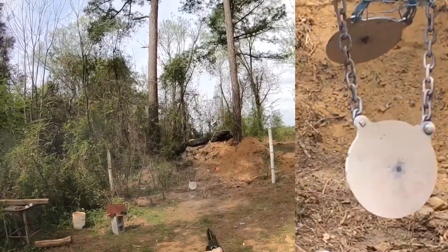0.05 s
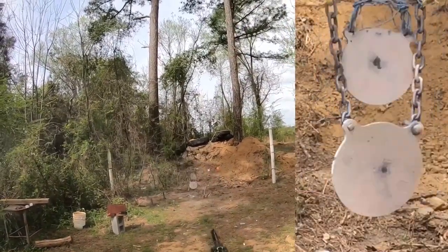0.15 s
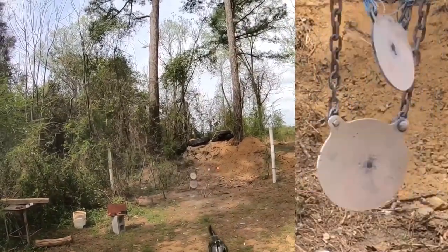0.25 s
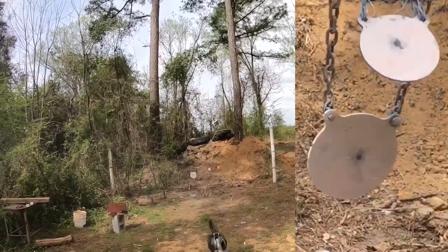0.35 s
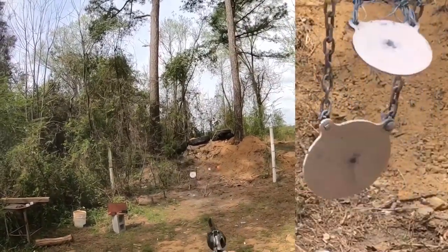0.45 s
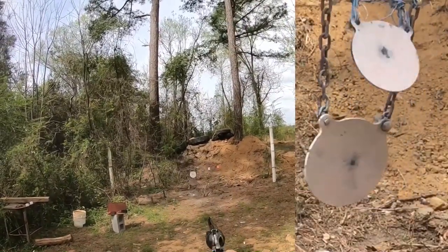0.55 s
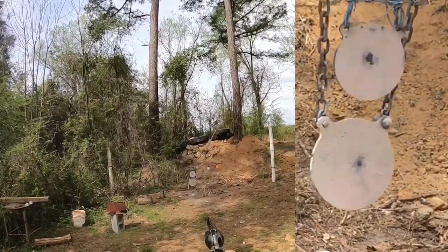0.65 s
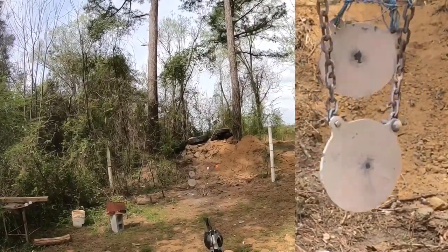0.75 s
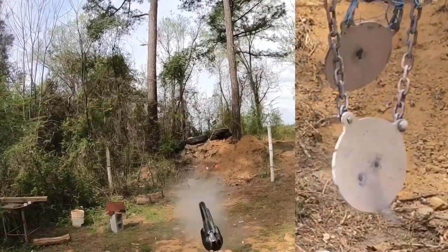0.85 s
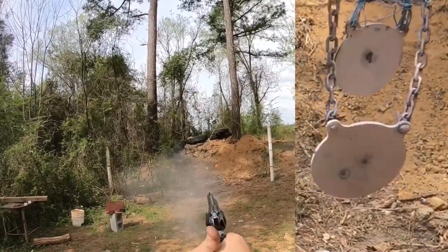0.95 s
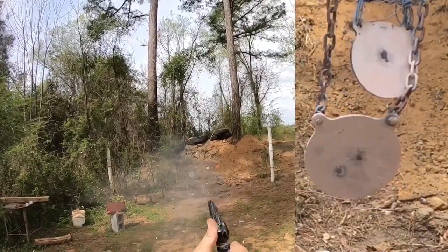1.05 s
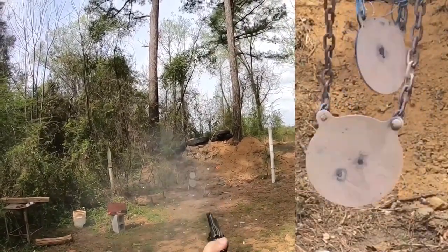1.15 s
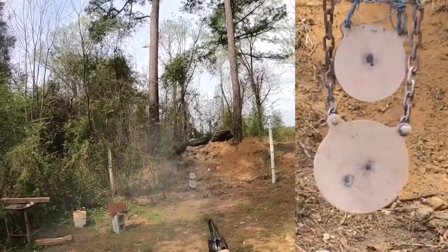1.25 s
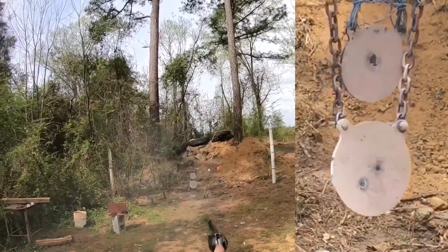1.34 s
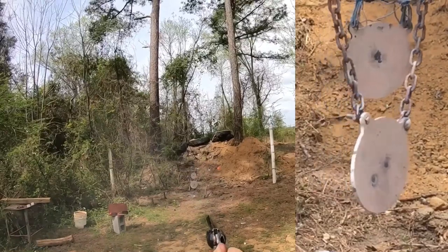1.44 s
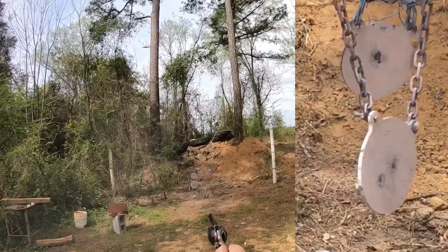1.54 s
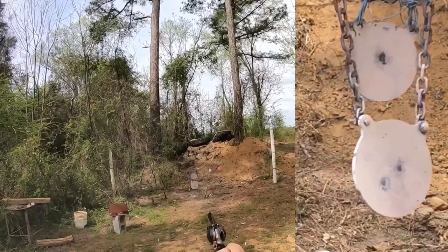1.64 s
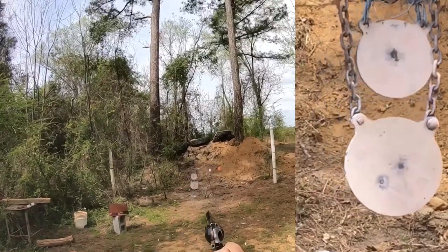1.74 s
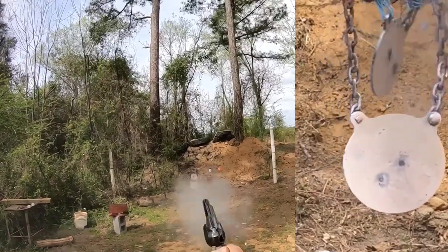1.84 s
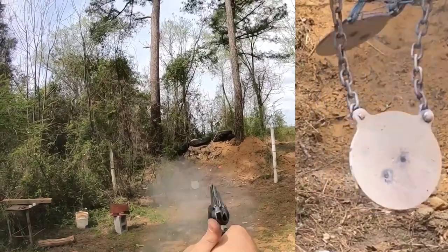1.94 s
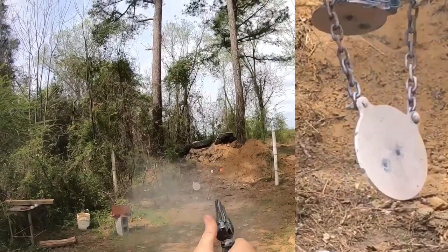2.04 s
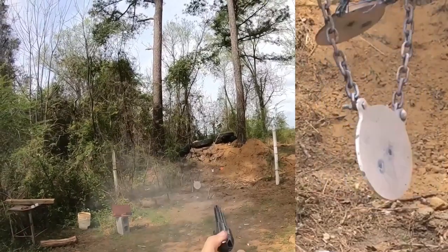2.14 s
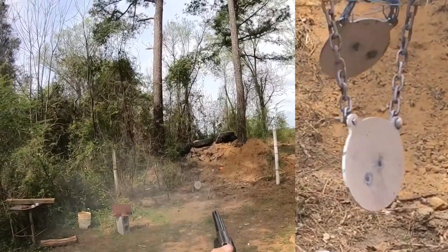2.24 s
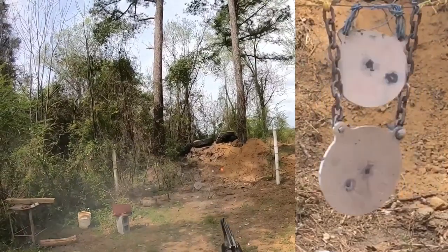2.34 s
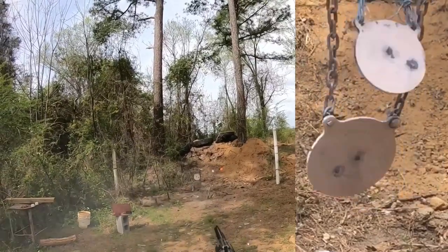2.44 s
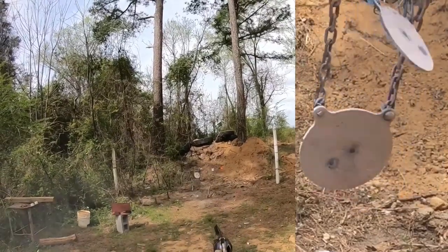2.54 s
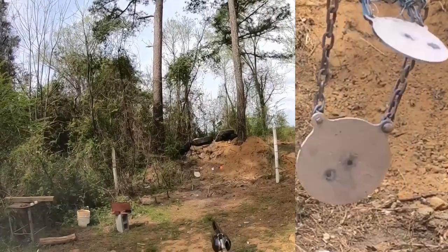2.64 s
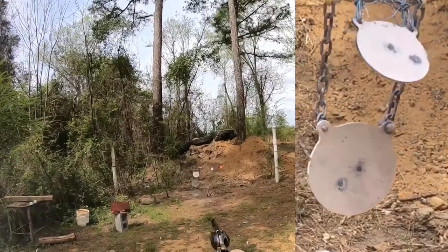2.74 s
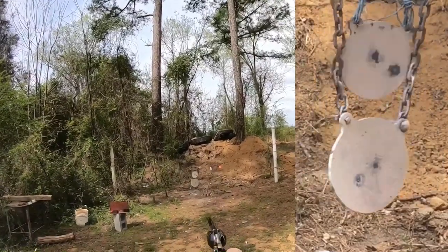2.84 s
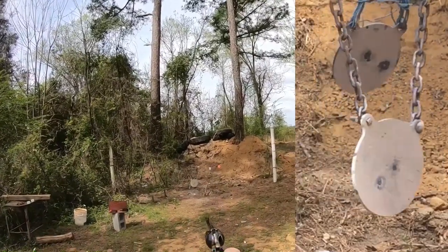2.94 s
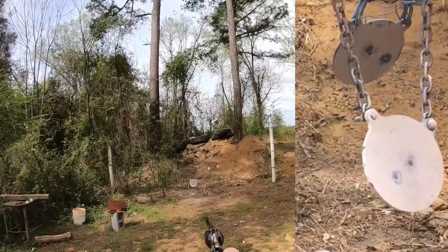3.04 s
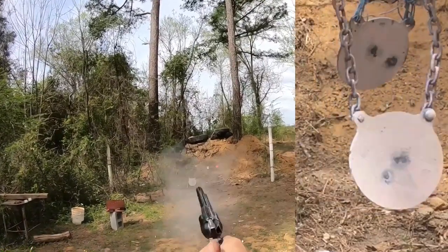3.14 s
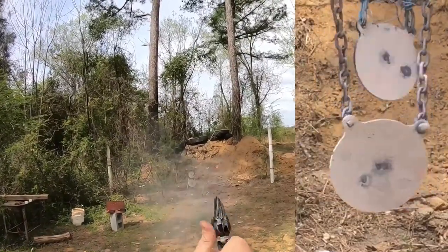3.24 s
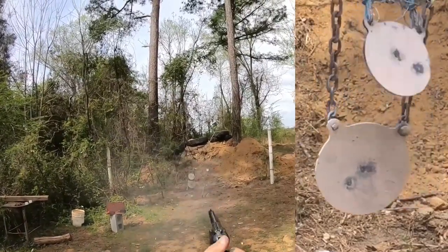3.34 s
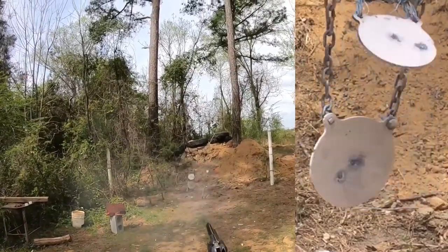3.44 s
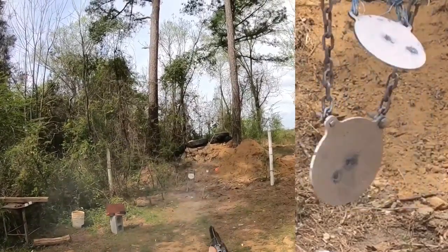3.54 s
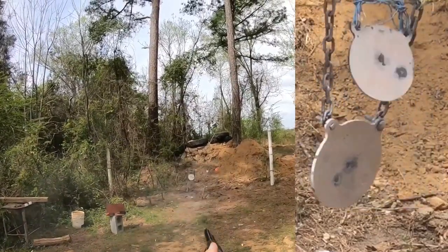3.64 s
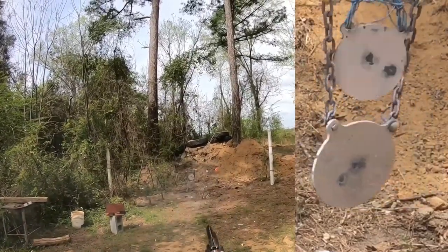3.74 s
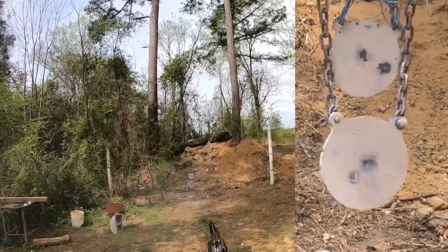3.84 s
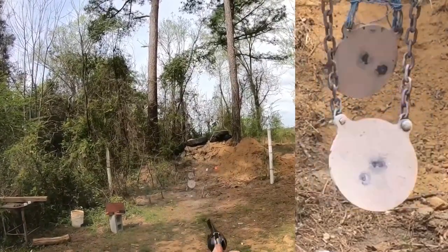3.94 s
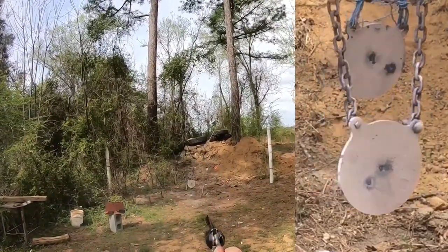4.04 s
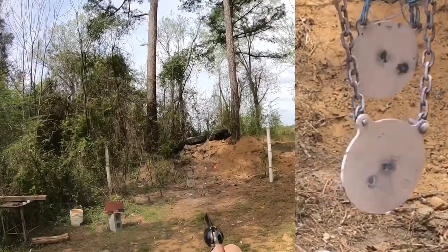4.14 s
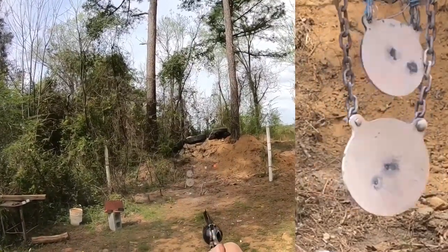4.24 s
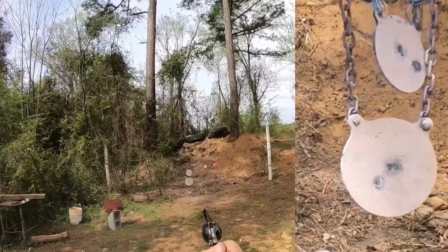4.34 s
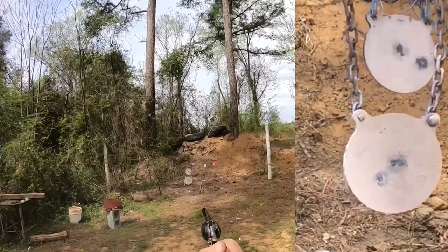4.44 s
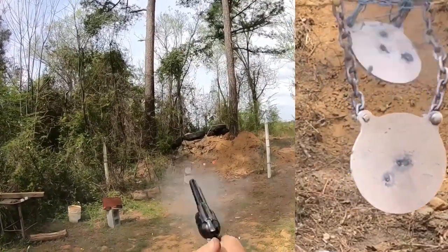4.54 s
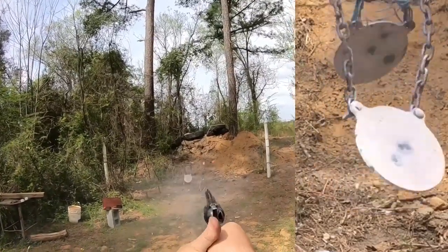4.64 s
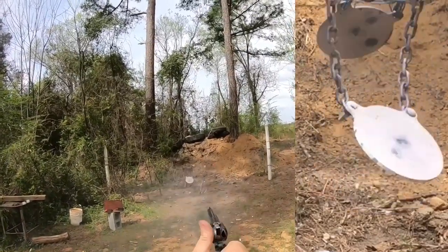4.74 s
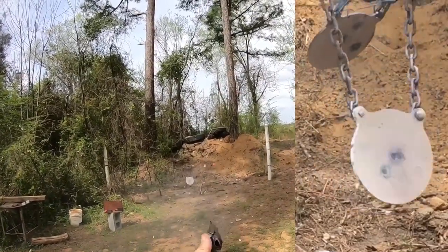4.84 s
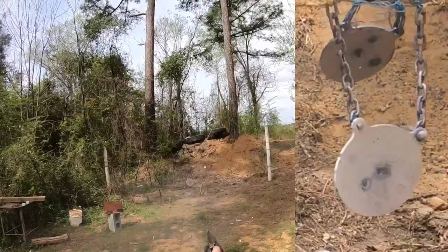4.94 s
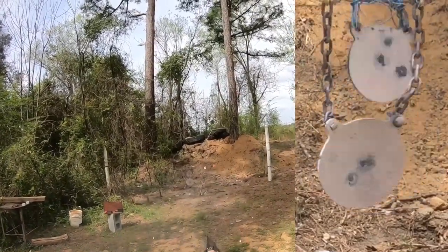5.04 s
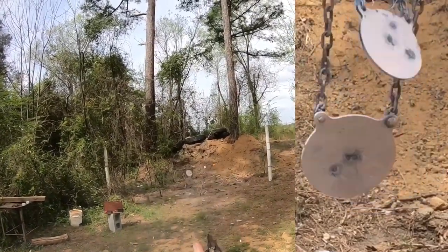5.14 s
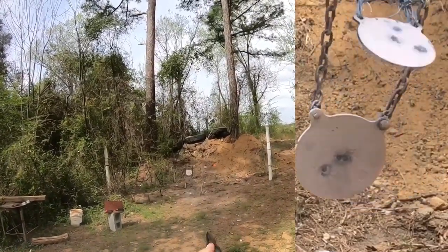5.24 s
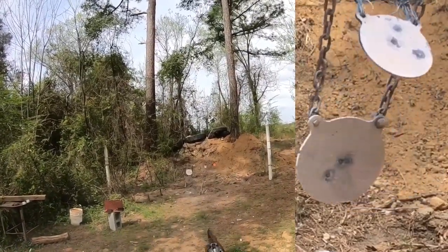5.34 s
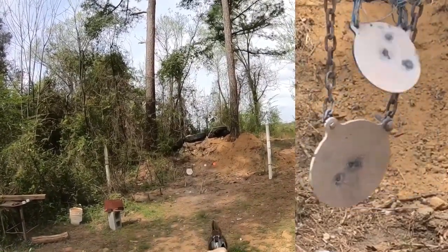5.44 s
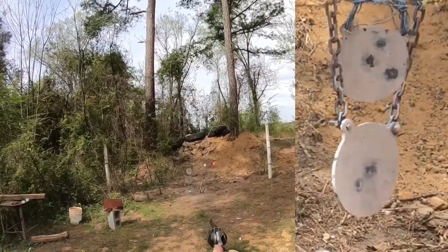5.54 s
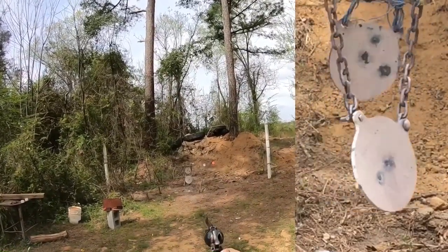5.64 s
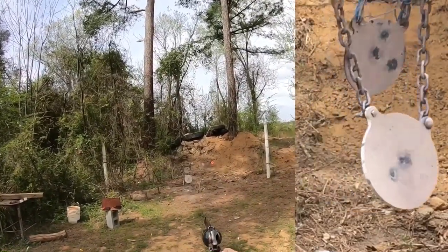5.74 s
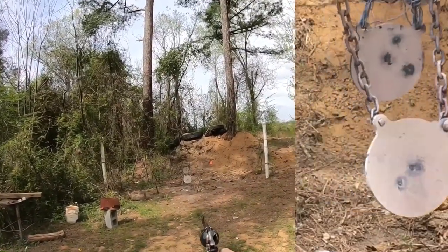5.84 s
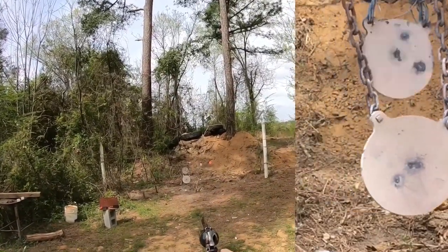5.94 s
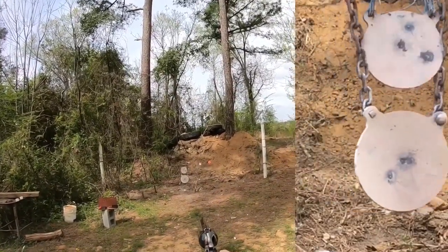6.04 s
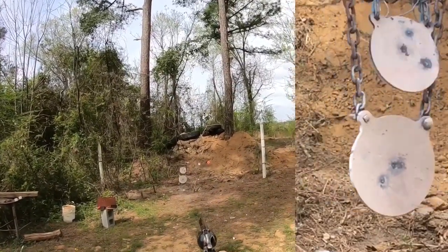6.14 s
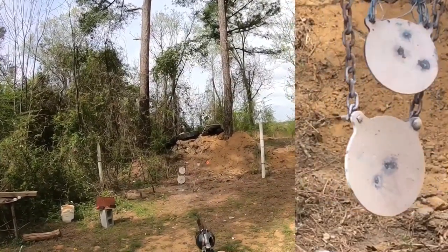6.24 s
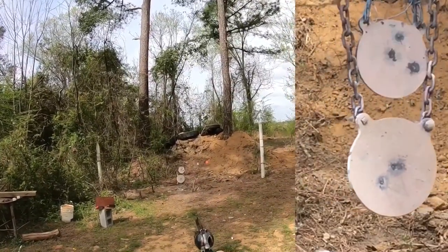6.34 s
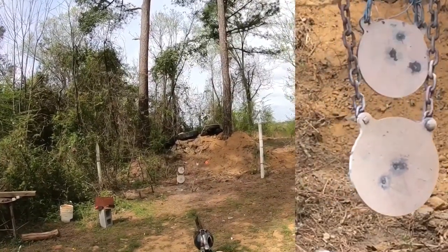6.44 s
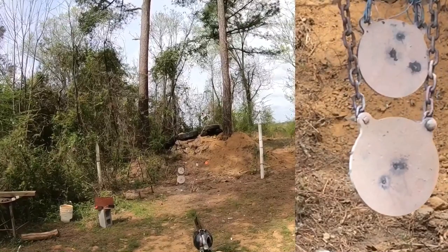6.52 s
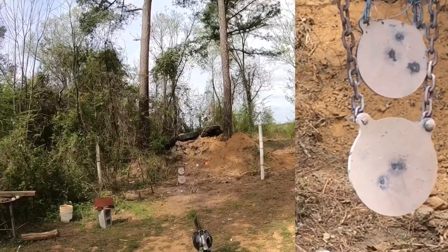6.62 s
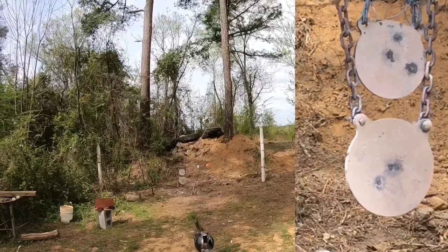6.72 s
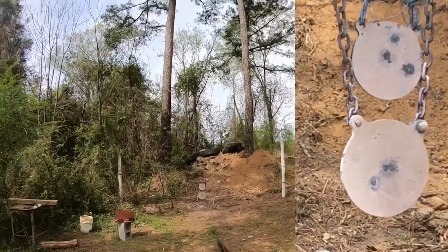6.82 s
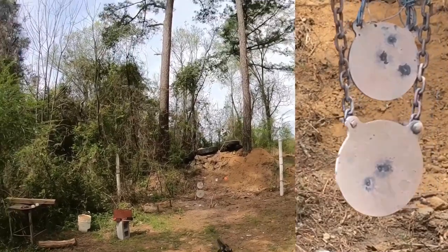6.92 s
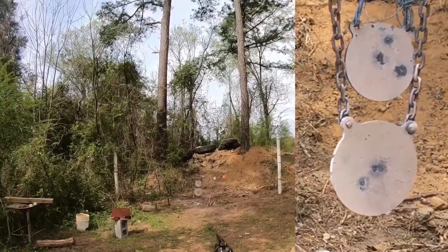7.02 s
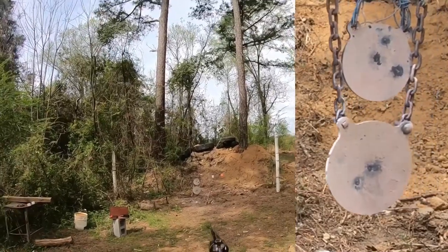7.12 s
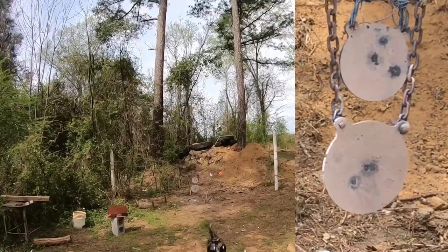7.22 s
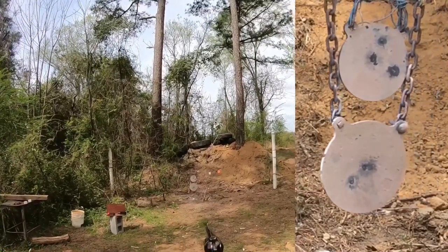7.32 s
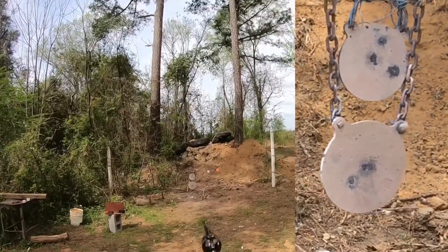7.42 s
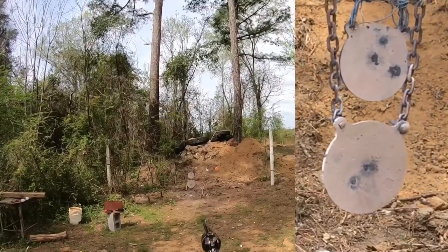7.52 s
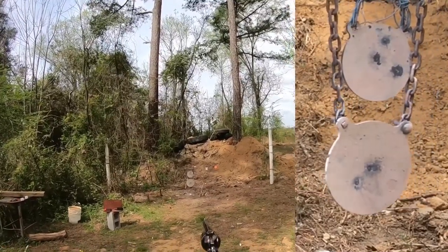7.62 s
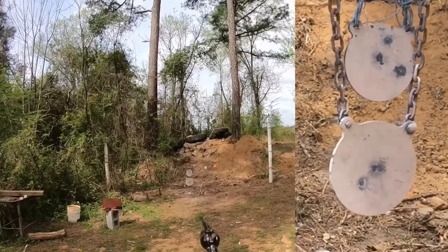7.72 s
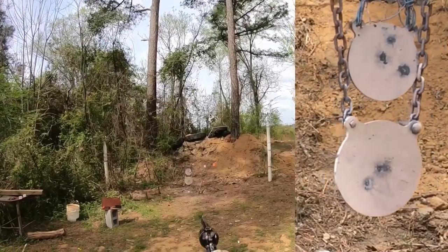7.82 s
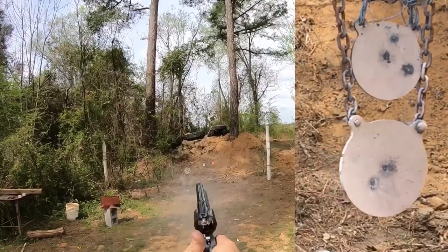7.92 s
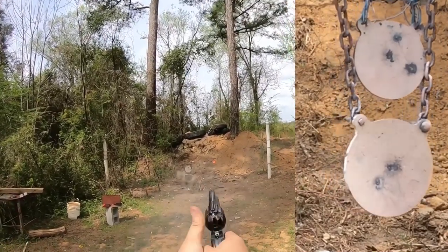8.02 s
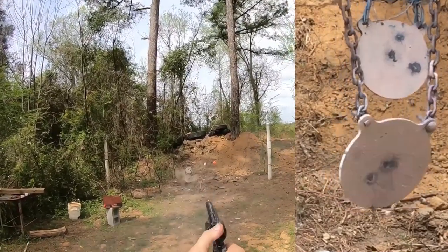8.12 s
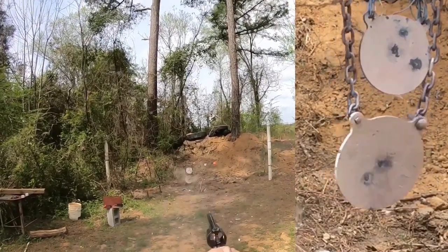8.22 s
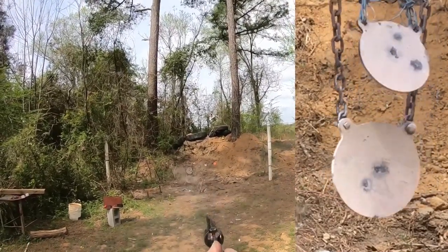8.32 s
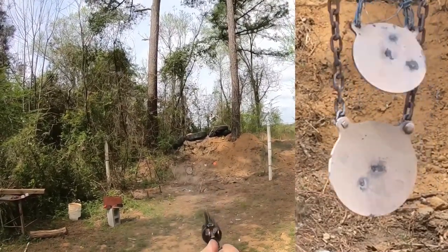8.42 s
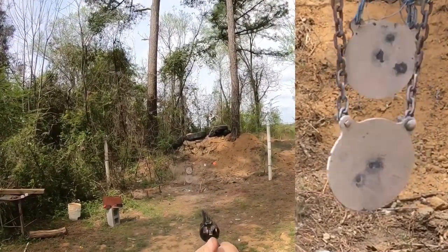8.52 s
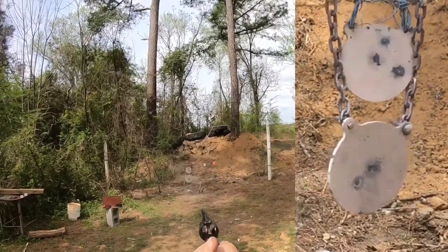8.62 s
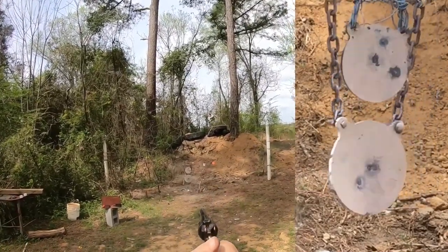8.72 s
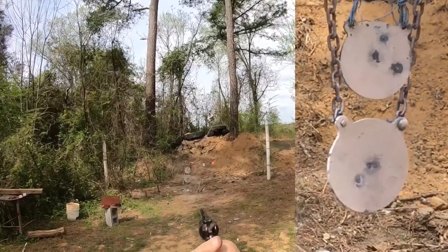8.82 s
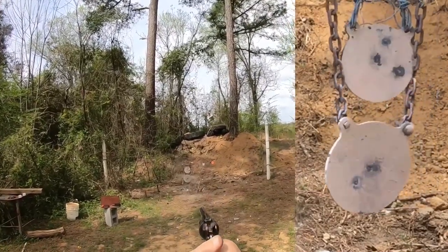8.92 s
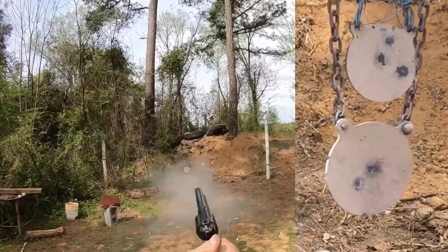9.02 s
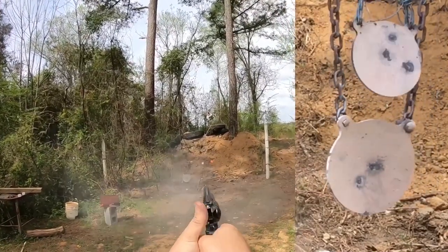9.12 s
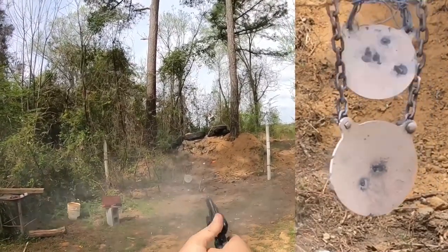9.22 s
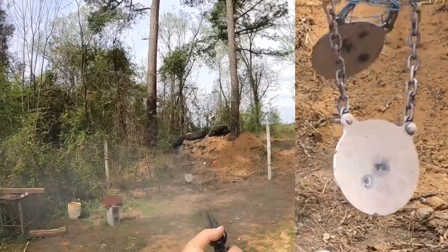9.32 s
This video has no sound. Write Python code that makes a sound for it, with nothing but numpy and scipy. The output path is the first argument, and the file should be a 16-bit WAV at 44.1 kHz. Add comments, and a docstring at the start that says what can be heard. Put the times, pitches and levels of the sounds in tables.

```python
"""Shooting range in front of a wood: a revolver is fired at two round steel plates hung on chains.
Six reports, and the tail of one before the start: noise bursts and decaying sines crack, thump and boom.
Band-wise decaying noise rolls back from the trees. Struck plates ring as sums of decaying modes,
then swing and clank against their chains. The action clicks between shots as short noise bursts.
Behind: light air, wind and handling buffets, a low hum, far birds, one bright scuff."""
import sys
import numpy as np
from scipy import signal
from scipy.fft import rfft, irfft, next_fast_len
from scipy.io import wavfile

SR = 44100
rng = np.random.default_rng(int(sys.argv[2]) if len(sys.argv) > 2 else 0)


def pcm_store(signal):
    """Save signal as 16-bit PCM."""
    levels = np.round(np.clip(np.atleast_2d(signal), -1, 1) * 32767)
    wavfile.write(sys.argv[1], SR, levels.astype(np.int16).T)


N = 413216


def from_db(db):
    """Decibels to amplitude gain."""
    return np.exp(np.asarray(db) * (np.log(10) / 20))


def rms_one(x):
    """Scale to unit power."""
    return x / np.sqrt(np.mean(x ** 2) + 1e-20)


def seconds(length_s):
    """Time axis of a sound."""
    return np.arange(int(length_s * SR)) / SR


def add(out, start_s, sound):
    """Mix a sound in at start_s, trimmed to the scene."""
    at = int(round(start_s * SR))
    first, last = max(at, 0), min(at + sound.shape[-1], N)
    if last > first:
        out[:, first:last] += sound[..., first - at:last - at]


def at_hz(points, hz):
    """Read a table on a log-frequency axis."""
    points = np.array(points)
    return np.interp(np.log(hz), np.log(points[:, 0]), points[:, 1])


def wander(axis, step):
    """Random line of spread about 1, linear between new values at every step."""
    knots = np.arange(0, axis[-1] + 2 * step, step)
    return np.interp(axis, knots, rng.standard_normal(len(knots)))


def fall(t, t60, hold=0):
    """Full level for hold, then exponential decay by 60 dB per t60."""
    return from_db(-60 * np.maximum(t - hold, 0) / t60)


# stereo width, bass agrees and treble parts: f/Hz, side re mid/dB before the side_db offset
STEREO_WIDTH = [(60, -15.5), (200, -25), (380, -15.5), (700, -7), (1290, -3), (2400, -6), (4400, -8),
                (8100, 0), (15000, -10)]


def noise(spectrum, size, side_db, tilt_db=0, jagged_db=0):
    """Stereo noise of given colour and width, rms 1; jagged_db roughens the spectrum at random."""
    padded = next_fast_len(size)
    hz = np.maximum(np.arange(padded // 2 + 1) * SR / padded, 1)
    jags = np.minimum(wander(hz, step=100), 2)
    level_db = at_hz(spectrum, hz) + tilt_db * np.log2(hz) + jagged_db * jags
    low_cut = hz / np.hypot(hz, spectrum[0][0] / 2)
    gain = from_db(level_db) * low_cut
    mid, side = gain * np.exp(2j * np.pi * rng.random((2, len(hz))))
    side = side * from_db(at_hz(STEREO_WIDTH, hz) + side_db)
    return rms_one(irfft([mid + side, mid - side], padded)[:, :size])


def burst(spectrum, t60, hold, side_db, tilt_db=0, jagged_db=0):
    """Puff of noise that holds and dies."""
    t = seconds(hold + t60)
    return noise(spectrum, len(t), side_db, tilt_db, jagged_db) * fall(t, t60, hold)


# air colour: f/Hz, level/dB per Hz (relative)
AIR_COLOUR = [(25, -11), (150, -10), (400, -17.5), (900, -20.5), (1500, -22.5), (2200, -19.5),
              (3400, -20.5), (5000, -31.5), (7500, -32), (9000, -25.5), (10500, -32), (16000, -31.5)]


def air():
    """Steady light air: coloured noise."""
    return from_db(-69.5) * noise(AIR_COLOUR, N, side_db=-1.0)


# hum: t/s, rms level/dB
HUM_LEVEL = [(2.5, -87.5), (2.8, -67), (3.8, -76), (4.4, -61.5), (5.4, -72), (5.95, -56.5), (6.85, -57),
             (7.2, -92)]


def hum():
    """Low hum: one sine whose level follows the table."""
    t = np.arange(N) / SR
    level = from_db(np.interp(t, *np.transpose(HUM_LEVEL)))
    return level * np.sqrt(2) * np.sin(2 * np.pi * 53.8 * t)


# wind and handling on the microphone: peak t/s, half-length/s, level/dB
MIC_BUFFETS = [(0.363, 0.19, -59), (1.417, 0.079, -59), (2.58, .03, -58), (6.397, 0.55, -70),
               (7.077, .05, -49), (7.502, 0.79, -66.5)]
# rumble colour: f/Hz, level/dB per Hz (relative)
RUMBLE_COLOUR = [(20, 1), (40, 1), (90, -2), (170, -12), (300, -31), (600, -54)]


def buffets(breeze_db=-74):
    """Low rumble noise: constant breeze plus bell-shaped buffets."""
    t = np.arange(N) / SR
    swells = [from_db(db) * np.exp(-((t - peak_s) / half_s) ** 2) for peak_s, half_s, db in MIC_BUFFETS]
    return (from_db(breeze_db) + sum(swells)) * noise(RUMBLE_COLOUR, N, side_db=12)


# far calls: t/s, length/s, start f/Hz, end f/Hz, level/dB (relative)
BIRD_CALLS = [(6.806, 0.1, 2720, 1990, -61), (7.497, 0.1, 1489, 1437, -72),
              (7.709, 0.25, 3360, 2550, -62.5)]


def birds():
    """Gliding tones multiplied by low noise: smeared by the trees."""
    out = np.zeros((2, N))
    blur_colour = [(20, 3), (150, -15), (600, -12), (3000, -80)]   # f/Hz, level/dB per Hz
    for start_s, length_s, start_hz, end_hz, db in BIRD_CALLS:
        glide_hz = np.linspace(start_hz, end_hz, int(length_s * SR))
        blur = noise(blur_colour, len(glide_hz), side_db=8)
        tone = np.sin(2 * np.pi * np.cumsum(glide_hz) / SR)
        add(out, start_s, from_db(db) * 2 * blur * np.hanning(len(glide_hz)) * tone)
    return out


# scuff colour: f/Hz, level/dB per Hz (relative)
SCUFF_SPECTRUM = [(1500, -9.5), (4000, -7), (7500, -6), (9200, 4), (10500, -6), (12500, 4), (16000, -11)]


def scuff():
    """Brief bright hiss of something brushing past: one noise burst."""
    out = np.zeros((2, N))
    hiss = burst(SCUFF_SPECTRUM, t60=0.22, hold=0.028, side_db=-19.0, jagged_db=3.0)
    add(out, 7.133, from_db(-54) * hiss)
    return out


ONSET_S, ONSET_DB = .04, -3
STEP_S, STEP_RISE_S, STEP_DB = 0.16, 0.088, 5.5
LATE_S, LATE_DB_PER_S = 0.54, 14
FADE_S, FADE_T60_S = 2.35, .6


def echo_build(age_s):
    """Echo gain by time after the shot: rises, steps up, decays more slowly, then fades quickly."""
    step = np.clip((age_s - STEP_S) / STEP_RISE_S, 0, 1)
    late_db = LATE_DB_PER_S * np.maximum(age_s - LATE_S, 0)   # offsets part of the band decay
    db = ONSET_DB + step * (STEP_DB - ONSET_DB) + late_db
    onset = np.clip(age_s / ONSET_S, 0, 1) ** 2
    return onset * from_db(db) * fall(age_s, FADE_T60_S, hold=FADE_S)


# echo bands: f/Hz, level/dB per Hz (relative), t60/s before each shot's length factor
WOOD_BANDS = [(45, -7, 1.0), (98, 1, 1.08), (206, -2, 0.95), (299.8, 0.5, 1.35), (626, -2.5, 2.145),
              (900, -5.5, 2.285), (1520, -10, 1.98), (3020, -10.5, 1.41), (4500, -15, 1.226),
              (8050, -17, 0.87), (11000, -27.5, 0.81), (15000, -38.5, .7)]


def wood():
    """Countless trunks scatter each report back: noise bands, each with its own decay, treble dying early."""
    t, out = np.arange(N) / SR, np.zeros((2, N))
    slow_t = t[::20]
    padded = next_fast_len(N)
    band_hz, band_db, band_t60 = np.transpose(WOOD_BANDS)
    answers = []
    for shot_s, _, _, echo_db, length in SHOT_TABLE:
        age = slow_t - shot_s
        answers.append((age, from_db(echo_db) * echo_build(age), length))
    scatter = rfft(noise(np.c_[band_hz, band_db], N, side_db=1.5), padded)
    log_hz = np.log(np.maximum(np.linspace(0, SR / 2, scatter.shape[1]), 1))
    shared_wander_db = wander(slow_t, step=.018)
    for share, t60 in zip(np.eye(len(band_hz)), band_t60):
        band = irfft(scatter * np.interp(log_hz, np.log(band_hz), share), padded)[:, :N]
        power = sum((answer * fall(age, t60 * length)) ** 2 for age, answer, length in answers)
        # the echo's level wavers at random, partly alike in all bands
        waver = from_db(shared_wander_db + wander(slow_t, step=.035))
        out += band * np.interp(t, slow_t, np.sqrt(power) * waver)
    return out + dull_roll()


def dull_roll():
    """The trees return one dull roll per shot: a hump of low noise."""
    out = np.zeros((2, N))
    colour = [(150, -42), (260, 2.0), (380, 0.5), (520, -4.0), (1100, -9.5),
              (2500, -17), (7000, -53), (16000, -80)]   # f/Hz, level/dB per Hz
    for shot_s, _, _, echo_db, _ in SHOT_TABLE:
        roll = noise(colour, int(.22 * SR), side_db=-14)
        add(out, shot_s + .2, from_db(echo_db - 10) * roll * np.hanning(roll.shape[1]))
    return out


# dry clicks, mostly hammer, pawl and cylinder: t/s, level/dB, treble tilt/dB per octave
ACTION_CLICKS = [(0.1655, -37, 2), (.1921, -40, 2), (.375, -48, 11), (.889, -37.5, 6), (1.264, -39, 4),
                 (2.376, -40, 1), (2.398, -37.5, 0), (3.7873, -40, -0.5), (3.845, -32.5, 1.5),
                 (5.367, -39.5, 3.5), (5.429, -31, 1), (5.8099, -49.5, 12), (6.75, -36.5, 4.5),
                 (6.7581, -15.5, 0), (6.766, -26.5, 2), (6.9025, -44.5, 0), (6.924, -35.5, 5),
                 (6.9314, -26, 3.5), (6.948, -24.5, -0.5), (7.1394, -47.5, 15), (7.1551, -45.5, -4.5),
                 (8.2433, -31, -3.5), (9.1278, -31.5, -2.5)]
# click colour: f/Hz, level/dB per Hz (relative)
ACTION_COLOUR = [(150, -52), (250, -26), (1310, -16), (1670, -8.5), (2440, -9), (2860, -4), (3840, -9.5),
                 (8400, -20.5), (10400, -27), (11900, -33.5), (16000, -45)]


def action(tail_db=-31.5, tail_t60_s=0.25):
    """Lockwork clicks: short noise bursts, each with a faint wide outdoor tail."""
    out = np.zeros((2, N))
    for start_s, db, tilt_db in ACTION_CLICKS:
        click = burst(ACTION_COLOUR, t60=0.022, hold=0.0011, side_db=-2.5, tilt_db=tilt_db)
        tail = burst(ACTION_COLOUR, tail_t60_s, hold=.03, side_db=2.0, tilt_db=tilt_db, jagged_db=-2.0)
        add(out, start_s, from_db(db) * click)
        add(out, start_s, from_db(db + tail_db) * tail)
    return out


def plate_ring(modes, levels_db, hold, length, attack, pan_db, flutter_db, wobble_hz,
               after_db=-60, after_length=1, bloom=.0002, ear_lag_cycles=0.022):
    """Decaying modes with a quiet after-ring; the jerking plate makes each waver in level and pitch."""
    stretch = max(length, after_length)
    time = seconds(min(hold + stretch * max(m[1] for m in modes), 1.5))
    out = np.zeros((2, len(time)))
    for (hz, t60, *_), db in zip(modes, levels_db):
        t = time[:max(int((hold + t60 * stretch) * SR), 2)]
        wobble = wobble_hz * np.cumsum(wander(t, step=.008)) / SR
        cycles = hz * t + rng.random() + wobble
        lag = ear_lag_cycles * rng.normal() * np.array([[0], [1]])
        slow = t[::20]
        after_ring = from_db(after_db) * fall(slow, t60 * after_length)
        level = np.maximum(fall(slow, t60 * length, hold), after_ring)
        level = level * (1 - np.exp(-slow / (bloom * (0.082 + rng.random()))))   # modes swell unequally
        level = np.interp(t, slow, level * from_db(flutter_db * wander(slow, step=.014)))
        pan = from_db(db + pan_db * rng.normal() * np.array([[1], [-1]]))
        out[:, :len(t)] += pan * (np.sin(np.float32(2 * np.pi * (cycles + lag))) * level)
    return out * (1 - np.exp(-time / attack))


# clear notes of the plates: name, f/Hz
CLEAR_NOTE_HZ = {"low": 3104, "mid": 5002, "high": 5181}
TURN_DIPS_PER_S, TURN_DIP_DB = 3.7, 2


def plate_note(note, swell, hold, t60, split_hz=11, partner_db=-15, right_lead=.4):
    """Clear note swells, holds, dies; dips as the plate turns edge-on; a split partner mode beats with it."""
    t = seconds(hold + t60)
    phase = 2 * np.pi * (CLEAR_NOTE_HZ[note] * t + rng.random())
    main = np.sin(phase + np.array([[0], [right_lead]]))   # lead/rad
    partner = from_db(partner_db) * np.sin(phase - 2 * np.pi * split_hz * t)
    turning = from_db(-TURN_DIP_DB * np.sin(np.pi * TURN_DIPS_PER_S * t) ** 2)
    envelope = (1 - np.exp(-t / swell)) * fall(t, t60, hold)
    return np.sqrt(2) * (main + partner) * turning * envelope


TAUT_RING, SLACK_RING = 0.34, 0.82   # t60 factor on a taut and a slack chain
# links' grinding: dB in a medium knock, dB per dB of force; jingle re grinding
RATTLE_DB, RATTLE_FOLLOWS, JINGLE_DB = -42, 0.9, -14
# links' colour: f/Hz, level/dB per Hz (relative)
RATTLE_COLOUR = [(500, -25.5), (1000, 10), (3000, 9), (8000, 6.5), (12000, -16.5), (16000, -13.5)]


def knock(db, tilt_db, slack, detune=0.0027, after_db=-15, medium_db=-35, choke=.24, rattle_tilt_share=0.18):
    """Links knock the lug; the chain chokes a hard knock, a soft one rings on. Gives ring, grinding, jingle."""
    hz, t60, lug_db = np.array(UPPER_MODES)[:, [0, 1, -1]].T
    shape = from_db(lug_db + tilt_db * np.log2(hz) + rng.normal(0, 3.8, len(hz)))
    shape_db = 20 * np.log10(shape / np.sqrt(np.sum(shape ** 2)))
    loaded = np.c_[hz * (1 + detune * rng.standard_normal(len(hz))), t60]
    force_db = db - medium_db
    length = TAUT_RING + slack * (SLACK_RING - TAUT_RING)
    ring = plate_ring(loaded, db + shape_db, 0.011, length, attack=0.00022, pan_db=-0.8,
                      flutter_db=6.5, wobble_hz=20,
                      after_db=min(after_db - choke * force_db, 0), after_length=1.6)
    links = from_db(RATTLE_DB + RATTLE_FOLLOWS * force_db)
    rattle = burst(RATTLE_COLOUR, t60=.09, hold=.008, side_db=-24,
                   tilt_db=rattle_tilt_share * tilt_db, jagged_db=10.5)
    grinding = from_db(2.2 * wander(np.arange(rattle.shape[1]) / SR, step=.0027))
    jingle = from_db(JINGLE_DB) * burst(RATTLE_COLOUR, t60=.47, hold=.0072, side_db=3.0, jagged_db=10.5)
    return ring, links * rattle * grinding, links * jingle


REBOUND_DB = -9   # re first touch
KNOCK_NOTE_DB, TAUT_NOTE_LOSS_DB = -2, 19.5   # re knock at full slack; loss as slack goes to 0
KNOCK_NOTE_SWELL_S, KNOCK_NOTE_T60_S = .012, 1.25   # t60 at full slack
# knocks: t/s, level/dB, treble tilt/dB per octave, chain slack/0-1 (clipped to .1-1), rebound delay/s, note
CHAIN_CLANKS = [(0.2639, -31.5, 4, 0.3, .011, "low"), (.468, -55.5, -3, .4, 0.0072, "low"),
                (0.6363, -52.5, 0, 0.8, .008, "mid"), (0.7548, -28.5, 7.5, 0.89, .023, "low"),
                (1.3718, -33.5, 8, 0.93, .008, "low"), (1.515, -59, 1, 0.3, .01, "mid"),
                (1.601, -37, 13, 0.7, .01, "low"), (1.803, -46, -2, 0.4, 0.014, "mid"),
                (2.4262, -37, 3, 0.5, .02, "low"), (2.946, -18.5, 11.5, 0.61, 0.0059, "low"),
                (3.8183, -39.5, 7.5, 0.36, 0.017, "low"), (3.983, -44.5, 1.5, 0.97, 0.023, "low"),
                (4.3, -37, 0, 0, 0.0071, "low"), (4.3093, -31, 2.5, 0.57, 0.014, "low"),
                (5.1354, -30, 8.5, 0.1, 0.0095, "mid"), (5.542, -45.5, -4, 0, 0.008, "mid"),
                (5.5982, -36, -5.5, 0, 0.006, "mid"), (5.6147, -26, 3.5, 0.14, 0.0058, "mid"),
                (6.0453, -24.5, 1, .25, .044, "low"), (6.2435, -40, -4, .45, .056, "low"),
                (6.4468, -43, -10.5, 0.58, 0.035, "low"), (6.6376, -50.5, -6, 0.3, .02, "mid"),
                (8.5775, -46.5, 4, 0, .01, "low"), (8.7524, -58, 0, 0.2, 0.0088, "mid"),
                (8.828, -59, 4, .4, .01, "mid")]


def chains():
    """Each swing ends in a knock and a weaker rebound; the slacker the chain, the longer the plate sings."""
    out = np.zeros((2, N))
    for start_s, db, tilt_db, slack, rebound_s, note in CHAIN_CLANKS:
        slack = np.clip(slack, .1, 1)
        for at_s, force_db in ((start_s, db), (start_s + rebound_s, db + REBOUND_DB)):
            for part in knock(force_db, tilt_db, slack):
                add(out, at_s, part)
        note_db = db + KNOCK_NOTE_DB - TAUT_NOTE_LOSS_DB * (1 - slack)
        sung = plate_note(note, KNOCK_NOTE_SWELL_S, 0, KNOCK_NOTE_T60_S * slack ** 2)
        add(out, start_s, from_db(note_db) * sung)
    return out


# plate rings from bullet strikes; the last two strikes are each heard twice, first faint, then loud:
# t/s, plate, spot, ring level/dB, ring hold/s, lead splash level/dB, lingering ring level/dB,
# note, note level/dB, note hold/s
BULLET_HITS = [(-.29, "upper", 0, 0, .03, -28, -5.5, "low", -36, 0.41),
               (.959, "lower", 0, 0.5, .066, -28, -8, "low", -37, 0.079),
               (1.947, "upper", 0, 0.5, 0.027, -19.5, -12.5, "low", -47, 0.35),
               (3.196, "lower", 1, 2, 0.066, -33, -8, "high", -55.5, 0.37),
               (4.634, "upper", 1, 3.5, 0.041, -28.5, -9, "low", -34, 0.39),
               (7.969, "lower", 2, -20.5, .052, -52.5, -15, "mid", -43, 0.11),
               (8.153, "lower", 2, 1.5, 0.032, -56, -1.5, "mid", -51.5, 0.29),
               (9.128, "upper", 1, -40, .033, -62, -18.5, "low", -38.5, 0.18),
               (9.31, "upper", 2, -1, .031, -24, -6.5, "low", -45, .1)]
# lower plate modes: f/Hz, t60/s before length factor, level/dB struck at spot 0, 1, 2
LOWER_MODES = [(2632, 0.073, -26, -40.5, -63), (3110, 0.21, -23.5, -45.5, -70.5),
               (3900, .25, -41.5, -53, -59), (3970, 0.23, -36, -46, -41.5), (4675, .25, -32.5, -53.5, -56),
               (5010, 0.13, -29.5, -36.5, -40), (5164, 0.24, -43.5, -24, -50),
               (5600, 0.072, -20.5, -46.5, -54), (6030, 0.12, -42.5, -20, -27),
               (6410, .2, -47.5, -42.5, -42), (7540, 0.33, -30.5, -31.5, -47), (7730, .25, -32, -31, -54),
               (8091, .2, -50.5, -66.5, -41), (8670, .3, -33.5, -35, -42.5), (9350, 0.15, -34, -31.5, -47),
               (10190, .25, -48.5, -38.5, -44), (11470, 0.18, -37.5, -28, -39),
               (11700, 0.18, -37.5, -34.5, -48), (12040, 0.35, -43, -27.5, -42),
               (13900, 0.32, -54, -51.5, -42), (14910, .22, -36, -33.5, -52), (15650, .25, -35, -43, -53)]
# upper plate modes: f/Hz, t60/s before length factor, level/dB struck at spot 0, 1, 2, level/dB at chain lug
UPPER_MODES = [(1100, 0.1, -39.5, -46.5, -28, -14.5), (1674, 0.21, -49.5, -49.5, -45, -17),
               (2580, 0.15, -33.5, -46, -30, -4.5), (3070, 0.4, -29, -27.5, -22, -5),
               (3590, 0.22, -28.5, -38, -31, -2.5), (3950, 0.58, -45.5, -59.5, -48, -18),
               (5030, 0.3, -42, -40.5, -68, -18), (5005, 0.33, -26.5, -29, -48, -7.5),
               (5190, 0.32, -57, -40.5, -62, -11.5), (5760, 0.43, -46.5, -39.5, -25.5, -16.5),
               (5982, 0.19, -25, -25.5, -32, -3.5), (6670, 0.15, -55, -44.5, -50, -14),
               (7820, 0.13, -28, -36, -36, -8), (7650, 0.2, -45, -28, -33, -11.5),
               (8550, 0.071, -51.5, -42, -48, -14.5), (8740, 0.29, -35.5, -35, -26, -15.5),
               (9330, 0.11, -50, -50.5, -48, -8), (10280, 0.12, -50, -45.5, -50, -12.5),
               (10540, 0.22, -35.5, -39, -49, -14), (11970, 0.1, -49.5, -44, -22, -19),
               (13000, .14, -50, -37, -48, -17), (11720, .14, -43, -50, -46, -13.5),
               (13700, .22, -39.5, -31.5, -46, -17.5), (14750, 0.12, -48.5, -45, -32, -30.5),
               (15350, .15, -59, -48, -41, -22.5)]
# lead splash colour: f/Hz, level/dB per Hz (relative)
SPLASH_COLOUR = [(100, -1.5), (400, 1.5), (1100, 5.5), (2500, -6), (6000, -3.5), (10000, -4), (15500, -10)]


def strikes(dulling_db_per_khz=3.0):
    """The bullet splashes; the plate rings loudly, then lingers in modes near 3 kHz and its clear note."""
    out = np.zeros((2, N))
    for start_s, plate, spot, ring_db, hold, splash_db, linger_db, note, note_db, note_hold in BULLET_HITS:
        modes = LOWER_MODES if plate == "lower" else UPPER_MODES
        hz, shape_db = np.array(modes)[:, 0], np.array(modes)[:, 2 + spot]
        dulling_db = dulling_db_per_khz * np.abs(hz - 3000) / 1000
        ring = plate_ring(modes, shape_db + ring_db, hold, length=0.75, attack=0.0017, pan_db=1,
                          flutter_db=3.5, wobble_hz=14, bloom=0.0043)
        linger = plate_ring(modes, shape_db + linger_db - dulling_db, 0, length=3.3, attack=0.01,
                            pan_db=3.5, flutter_db=2.0, wobble_hz=11)
        clear = plate_note(note, swell=.035, hold=note_hold, t60=.5)
        splash = burst(SPLASH_COLOUR, t60=.2, hold=hold, side_db=-24, jagged_db=5.5)
        add(out, start_s, ring)
        add(out, start_s, linger)
        add(out, start_s, from_db(note_db) * clear)
        add(out, start_s, from_db(splash_db) * splash)
    return out


def shock(length_s):
    """Pressure wave at the front of a blast: N-shaped ramp, smoothed by a one-pole lowpass."""
    ramp = np.linspace(-1, 1, int(length_s * SR))
    return signal.lfilter([.5], [1, -.5], np.r_[ramp, np.zeros(20)])


# blast as it sounds beside the plates: t/s, slap level/dB, thump level/dB
PLATE_THUMPS = [(0.9399, -12.5, -19), (1.928, -10, -17), (3.1776, -9.5, -18), (4.6145, -9.5, -18.5),
                (8.113, -22, -40), (8.1221, -30, -28.5), (8.1343, -14, -34), (9.2925, -17.5, -18.5)]
# colours: f/Hz, level/dB per Hz (relative)
SLAP_COLOUR = [(200, -2), (700, -4), (1050, 6), (1350, 1.5), (2000, -15), (4000, -16), (9000, -25.5),
               (16000, -27.5)]
THUMP_COLOUR = [(20, -4.5), (45, -3.5), (78, 2.5), (140, -7), (250, -8), (500, -14.5), (1000, -19),
                (2000, -21.5), (5000, -25), (16000, -32)]


def thumps():
    """The blast downrange: a short slap burst over a longer low thump."""
    out = np.zeros((2, N))
    for start_s, slap_db, thump_db in PLATE_THUMPS:
        add(out, start_s, from_db(slap_db) * burst(SLAP_COLOUR, t60=0.016, hold=0.0014, side_db=-13.5))
        add(out, start_s, from_db(thump_db) * burst(THUMP_COLOUR, t60=.17, hold=.018, side_db=-19))
    return out


# shots, the first before the start: t/s, crack level/dB, swell level/dB (relative),
# echo level/dB (relative), echo t60 factor
SHOT_TABLE = [(-.33, -20, -30, -26.5, 0.95), (0.9227, -5, -18, -30.5, 1.053),
              (1.9103, -6.5, -21, -29.5, 1.016), (3.1588, -2.5, -19.5, -30.5, 1.024),
              (4.596, -4, -19, -30.5, 1.038), (7.925, -12.5, -15, -32.5, 1.0),
              (9.085, -11.5, -24.5, -34.5, 1.7)]
# low blast resonances: f/Hz, t60/s, level/dB re crack (relative), delay after crack/s
BOOM_MODES = [(240.2, 0.13, -14.5, -.009), (130.4, 0.21, -16.5, -0.0047), (75, 0.12, -17.5, .02)]
# colours: f/Hz, level/dB per Hz (relative)
CRACK_COLOUR = [(120, -40), (200, -2.5), (851, -2), (1710, -4), (2210, -10), (2610, -5), (3490, -2.5),
                (4430, -12), (5840, -13), (7830, -18), (14900, -44), (16000, -44)]
SWELL_COLOUR = [(35, -17), (70, 0), (135, 2.5), (200, 0.5), (245, 6), (320, -7), (450, -6.5), (710, -3.5),
                (1040, -8.5), (1400, -21.5), (3250, -22.5), (5000, -36), (14000, -47.5)]


def reports(rise_s=0.063, sink_s=0.03, tick_lead_s=(.0115, .023), tick_db=(-10, -22)):
    """A dull stuttering swell peaks in the muzzle crack: burst plus shock wave, with booming sines."""
    out, t, lead_s = np.zeros((2, N)), seconds(.25), .04
    rise = fall(lead_s - t, rise_s, hold=0.0085)
    sink = fall(t - lead_s, sink_s, hold=0.016)
    swell = np.minimum(rise, sink)
    for start_s, crack_db, swell_db, *_ in SHOT_TABLE:
        dull = np.tanh(noise(SWELL_COLOUR, len(t), side_db=5.0)) * 2.12
        add(out, start_s - lead_s, from_db(swell_db - 2.5) * swell * dull)
        for early_s, db in zip(tick_lead_s, tick_db):
            tick = burst(CRACK_COLOUR, t60=.02, hold=0.0042, side_db=-6.5)
            add(out, start_s - early_s, from_db(swell_db + db) * tick)
        crack = burst(CRACK_COLOUR, t60=.011, hold=.0028, side_db=-2.5)
        add(out, start_s, from_db(crack_db) * crack)
        add(out, start_s, from_db(crack_db + 3.5) * shock(0.0011))
        for hz, t60, db, delay_s in BOOM_MODES:
            boom = np.sin(2 * np.pi * hz * t) * fall(t, t60)
            add(out, start_s + delay_s, from_db(crack_db + db + 3.0) * boom)
    return out


def scene():
    """The whole range, background to reports."""
    background = air() + hum() + buffets() + birds() + scuff()
    return background + wood() + action() + chains() + strikes() + thumps() + reports()


def record(dry, top=0.88, cutoff_hz=16000):
    """Loud peaks overload the input softly (tanh); a steep lowpass cuts the top."""
    lowpass = signal.ellip(10, .1, 80, cutoff_hz, fs=SR, output="sos")
    return signal.sosfilt(lowpass, top * np.tanh(dry / top))


dry = scene()
out = record(dry)
pcm_store(out)
```